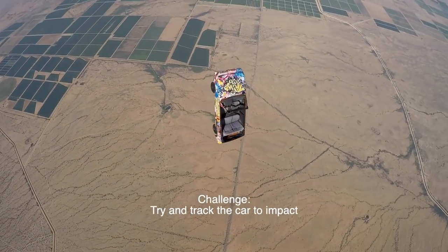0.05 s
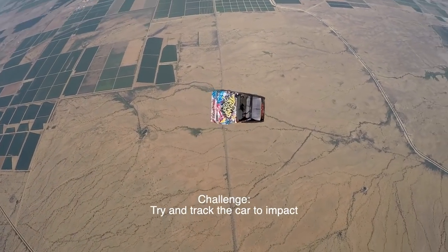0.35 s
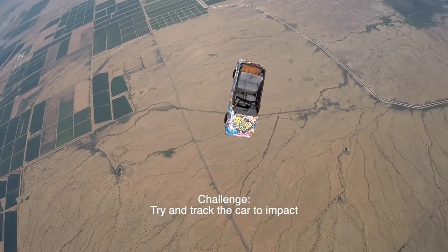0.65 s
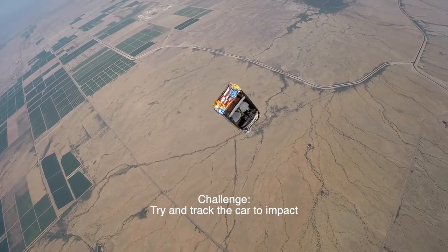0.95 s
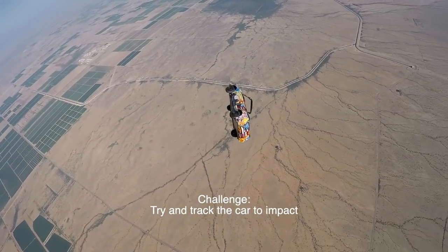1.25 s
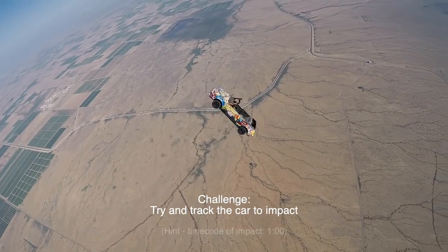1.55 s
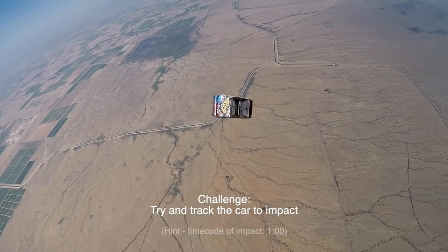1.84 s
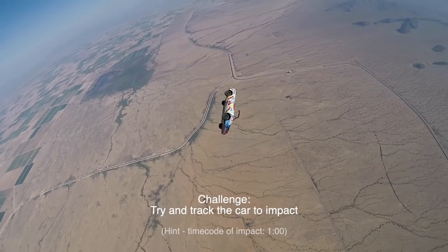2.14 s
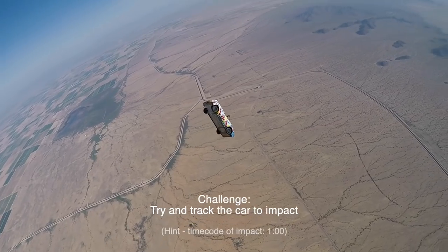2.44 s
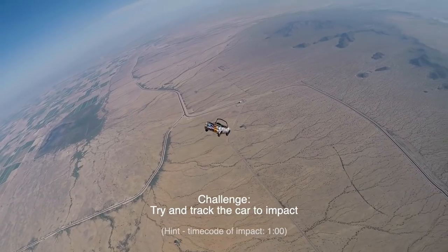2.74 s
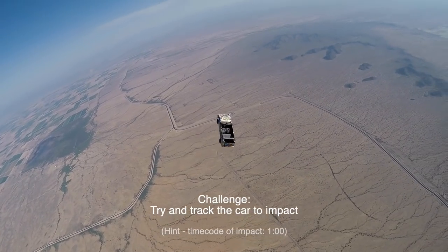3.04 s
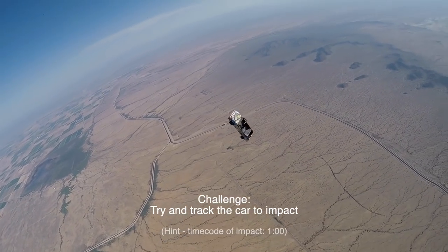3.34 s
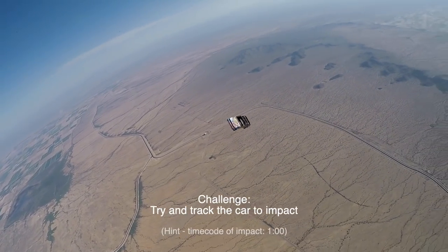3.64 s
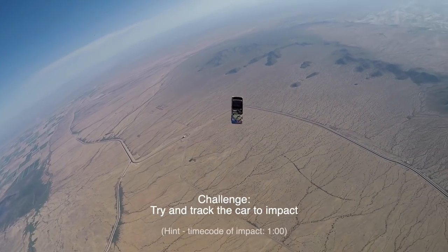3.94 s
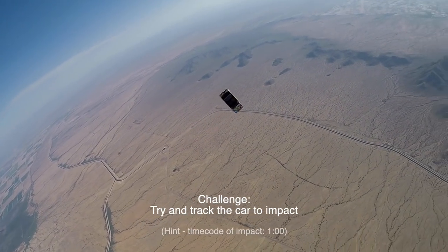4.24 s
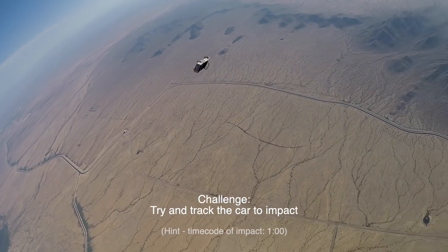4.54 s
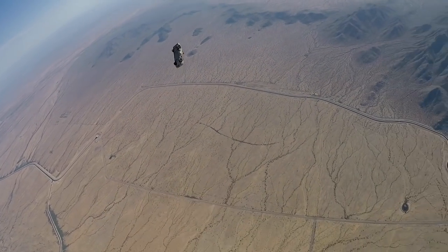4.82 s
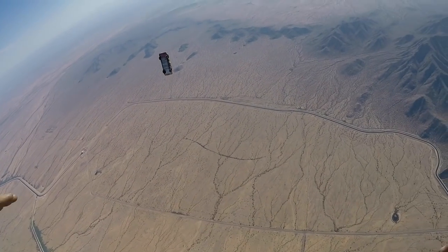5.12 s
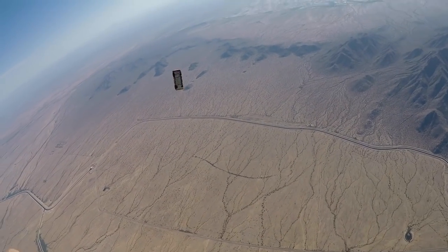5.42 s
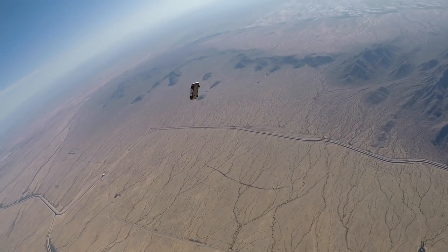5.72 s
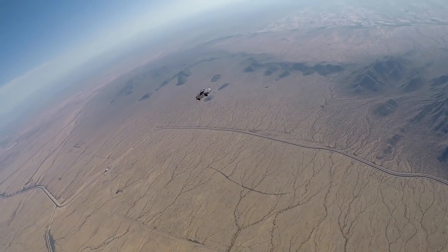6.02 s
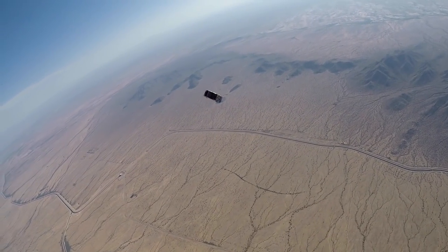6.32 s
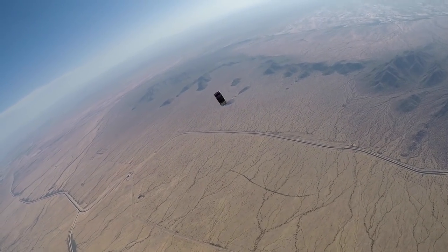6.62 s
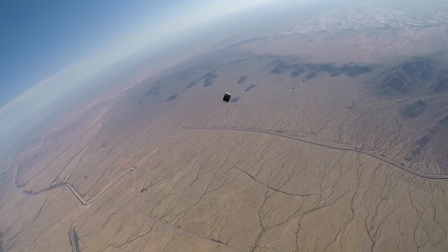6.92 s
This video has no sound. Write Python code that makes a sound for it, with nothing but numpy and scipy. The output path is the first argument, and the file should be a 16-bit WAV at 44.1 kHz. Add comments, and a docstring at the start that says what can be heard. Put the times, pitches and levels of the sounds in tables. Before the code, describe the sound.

Loud freefall wind buffets a helmet microphone, a dense rumbling roar thinning into a darker, gusty flutter.

```python
"""Freefall wind on a helmet camera

Air tears past high above open ground. Large eddies buffet the microphone, smaller ones roar and rip,
and the air hisses, whistles and spits across its port. As the head turns, the dense rush thins into
a darker, sputtering flutter, broken by gusts and slaps. A limiter holds the peaks."""
import sys
import numpy as np
from scipy import signal
from scipy.fft import rfft, irfft, next_fast_len
from scipy.io import wavfile
from scipy.ndimage import uniform_filter1d, minimum_filter1d

SR = 44100
rng = np.random.default_rng(int(sys.argv[2]) if len(sys.argv) > 2 else 0)


def materialize(psi):
    """Save the field psi as 16-bit PCM at rate SR to the path in sys.argv[1].

    A 1-D psi becomes a single channel; in a 2-D psi each row is a channel.
    """
    bounded = np.clip(np.atleast_2d(psi).T, -1, 1)
    quanta = np.round(bounded * 32767).astype(np.int16)
    wavfile.write(sys.argv[1], SR, quanta)


N = 307376
TIME = np.arange(N) / SR


def from_db(db):
    """Decibels to gain."""
    return 10 ** (np.asarray(db) / 20)


def unit_power(x):
    """Scale to an RMS of 1."""
    return x / np.sqrt(np.mean(x ** 2) + 1e-20)


def steady(x, size=SR // 10):
    """Ride the level to unit power over every short stretch; the faster flutter stays."""
    return x / np.sqrt(uniform_filter1d(uniform_filter1d(x ** 2, size), size // 2) + 1e-12)


def automation(table):
    """One curve for each column after the time, ramping from row to row."""
    times, *columns = np.transpose(table)
    return [np.interp(TIME, times, column) for column in columns]


def colour(x, spectrum):
    """EQ by a curve drawn on a log-frequency axis; white noise keeps its power."""
    size = next_fast_len(N + SR // 4)
    hz = np.maximum(np.arange(size // 2 + 1) * SR / size, 1)
    points_hz, points_db = np.transpose(spectrum)
    gain = from_db(np.interp(np.log(hz), np.log(points_hz), points_db, left=-np.inf, right=-np.inf))
    return irfft(rfft(x, size) * unit_power(gain), size)[:N]


def drift(rate_hz, step=8):
    """Smooth random modulation with a spread of about 1, rolling off above rate_hz."""
    pole = np.exp(-2 * np.pi * rate_hz * step / SR)
    noise = rng.standard_normal((N + SR) // step + 2)
    slow = signal.lfilter([1], [1, -2 * pole, pole * pole], noise)[SR // step:]
    return np.interp(np.arange(N) / step, np.arange(len(slow)), unit_power(slow))


def tails(triggers, decay_s):
    """Give every trigger an instant attack and an exponential decay."""
    return signal.lfilter([1], [1, -np.exp(-1 / (decay_s * SR))], triggers + 1e-12)


def resonance(centre_hz, width_hz):
    """Noise ringing in a narrow band whose centre may glide."""
    phase = 2 * np.pi * np.cumsum(centre_hz) / SR
    return unit_power(drift(width_hz) * np.cos(phase) + drift(width_hz) * np.sin(phase))


def turbulence(swing_db, spectrum):
    """Coloured pressure noise that comes in lumps."""
    return steady(colour(from_db(swing_db) * rng.standard_normal(N), spectrum))


def eddies(kicks_per_s=110):
    """Turbulent modulation: slow swirls, flutter, fine grain and sudden kicks, summed and soft-clipped."""
    churn = 0.23 * drift(22.2) + drift(84.0) + 1.21 * drift(247)
    arrivals = (rng.random(N) < kicks_per_s / SR) * rng.uniform(0.76, 1, N)
    kicks = tails(arrivals, decay_s=0.0084)
    cascade = unit_power(churn + 0.75 * unit_power(kicks - kicks.mean()))
    return unit_power(np.tanh(cascade / 2))


# gusts tearing through the broken flow: (start [s], length [s], rise [dB])
GUST_CUES = [(3.297, 0.09, 7.5), (3.413, .066, 4), (3.495, 0.098, 5.5), (3.63, 0.12, 4.5),
             (3.875, .11, 7.5), (4.0, 0.055, 5.5), (4.06, .034, 10), (4.165, .055, 5.5), (4.341, 0.056, 11),
             (4.444, 0.076, 6), (4.605, 0.099, 5), (4.777, 0.038, 6), (4.905, 0.051, 8.5),
             (5.025, 0.061, 7.5), (5.15, 0.04, 7.5), (5.208, .035, 8.5), (5.303, .14, 4),
             (5.628, 0.039, 12), (5.774, 0.034, 5.5), (5.885, .045, 6), (5.981, 0.066, 7.5),
             (6.121, 0.056, 4.5), (6.185, 0.045, 1.5), (6.529, 0.048, 6), (6.665, 0.072, 11.5)]
# lulls, when the stream briefly lets go of the microphone: (start [s], length [s], drop [dB])
LULL_CUES = [(1.15, 0.18, -2), (3.144, .058, -2.5), (3.456, 0.049, -6), (3.575, 0.067, -5),
             (4.11, 0.039, -2.5), (4.886, 0.033, -6), (5.07, 0.046, -4), (5.499, 0.13, -7.5),
             (5.66, 0.044, -14), (6.04, 0.038, -5.5), (6.458, 0.029, -11), (6.782, .087, -7)]


def gusts_and_lulls(attack_share=0.44):
    """Level ride in dB: each surge or lull is a rounded arch, a little quicker in than out."""
    ride_db = np.zeros(N)
    for start, length, db in GUST_CUES + LULL_CUES:
        progress = np.interp((TIME - start) / length, [0, attack_share, 1], [0, 0.5, 1])
        ride_db += db * np.sin(np.pi * progress)
    return ride_db


# low rumble EQ: (frequency [Hz], relative gain [dB])
BUFFET_EQ = [(12, -4.5), (25, -2), (45, -0.5), (100, -1.5), (165, -1.5), (240, -9), (330, -13.5),
             (480, -36.5), (800, -62)]
# eddies shed regularly by the helmet: (time [s], shedding rate [Hz], level against the rumble [dB])
SHEDDING = [(0, 63.4, -8), (.5, 61.16, -6.5), (1.05, 63.05, -4), (1.45, 57.3, -7), (1.75, 66.2, -18),
            (2.0, 70.37, -3), (2.3, 73.2, -1.5), (2.8, 68.4, -2.5), (3.15, 72.6, -4.5), (3.7, 66, -8),
            (4.25, 97.86, -4), (4.6, 67, -10.5), (5.4, 65.8, -6), (5.85, 78, -4), (6.25, 66, -7),
            (6.97, 66, -4)]


def buffet(level_db, swirl):
    """Large eddies rumble on the microphone while the helmet's shedding adds a pitched throb."""
    throb_hz, throb_db = automation(SHEDDING)
    throb = from_db(throb_db) * steady(resonance(throb_hz, width_hz=3.15))
    rumble = turbulence(2.33 * swirl, BUFFET_EQ)
    return from_db(level_db) * steady(rumble + throb)


# low-mid roar EQ: (frequency [Hz], relative gain [dB])
ROAR_EQ = [(130, -1.5), (230, 1.5), (340, 0.5), (500, -2.5), (650, -10.5), (850, -20), (1300, -34.5),
           (2500, -65.5)]


def roar(level_db, swirl):
    """Mid-sized eddies on the housing give the wind its weight."""
    return from_db(level_db) * turbulence(4.0 * swirl, ROAR_EQ)


# midrange tearing EQ and its brighter edge: (frequency [Hz], relative gain [dB])
RIP_EQ = [(350, -19), (620, 2), (950, -3.5), (1300, -7.5), (2000, -17), (2600, -24.5), (3300, -32),
          (4500, -36), (8000, -52)]
FINE_RIP_EQ = [(700, -0.5), (1400, 1.5), (2000, -5), (3000, -17), (4200, -12.5), (7000, -36)]


def rip(level_db, breakup, swirl):
    """Small eddies bunch into tearing bursts; the finest fade as the flow breaks up."""
    coarse = from_db(level_db) * turbulence(4.55 * swirl, RIP_EQ)
    fine = from_db(level_db - 5.0 - 9.7 * breakup) * turbulence(4.9 * swirl, FINE_RIP_EQ)
    return coarse + fine


# air bed EQ: (frequency [Hz], relative gain [dB])
BODY_RUSH_EQ = [(400, 1.5), (900, 0.5), (1600, -12), (2400, -18), (3400, -24.5), (4500, -25)]


def body_rush(swirl, level_db=-60):
    """Air streaming around the body lays a smooth bed between the gusts."""
    return from_db(level_db) * turbulence(1.6 * swirl, BODY_RUSH_EQ)


def port_filter(x, centre_hz, damping, block=1024):
    """The port is a resonant high-pass: it rings at its moving centre and passes what lies above."""
    out, state = np.zeros(N), np.zeros(2)
    for i in range(0, N, block):
        g = np.tan(np.pi * centre_hz[i] / SR)
        poles = [1 + damping * g + g * g, 2 * (g * g - 1), 1 - damping * g + g * g]
        out[i:i + block], state = signal.lfilter([1, -2, 1], poles, x[i:i + block], zi=state)
    return out


# hiss EQ ahead of the port's resonance: (frequency [Hz], relative gain [dB])
HISS_EQ = [(1500, -7), (3000, -10), (4400, 4), (5600, -0.5), (6800, -1), (7800, -0.5), (9300, 2.5),
           (10400, -7.5), (11400, -14), (13000, -30)]


def port_hiss(air_db, port_hz, breakup, swirl, grain):
    """Air across the port makes a resonant hiss and a breathy whistle that rings best in smooth flow."""
    rush = turbulence(2.6 * swirl + 0.6 * grain, HISS_EQ)
    hiss = from_db(air_db - 3.0) * unit_power(port_filter(rush, port_hz, damping=0.22))
    whistle = steady(resonance(port_hz, width_hz=590) * from_db(5.8 * swirl))
    return hiss + from_db(air_db - 2.5 - 12.6 * breakup) * whistle


# top-end sizzle EQ: (frequency [Hz], relative gain [dB])
SIZZLE_EQ = [(6000, -30), (8500, -14.5), (10200, -1.5), (11300, -8), (12100, 3), (12900, 2.5),
             (15100, -5.5), (16000, -18)]
# sizzle fader, before gusts and trim: (time [s], level [dB])
SIZZLE_FADER = [(0.0, -56), (0.7, -59), (1.5, -56.5), (2.2, -63), (3.35, -65.5), (4.1, -83.0),
                (4.72, -76.0), (5.15, -86.0), (6.05, -82), (6.7, -75), (6.97, -73.0)]


def port_sizzle(gust_db, swirl, grain):
    """Air at the port adds a thin, grainy sizzle at the very top."""
    fader_db, = automation(SIZZLE_FADER)
    return from_db(fader_db + 0.7 * gust_db - 1.0) * turbulence(2.0 * swirl + 7.5 * grain, SIZZLE_EQ)


# sharp spits at the port: (time [s], relative level [dB])
SPIT_CUES = [(0.964, -19), (1.091, -20), (1.4, -24.5), (1.631, -23), (1.68, -27), (1.81, -23),
             (1.904, -28.5), (2.068, -25), (2.176, -32), (2.346, -27), (2.786, -27), (6.907, -32)]
# crackle and spit EQ ahead of the port's resonance: (frequency [Hz], relative gain [dB])
SNAP_EQ = [(3500, -24), (4600, 0), (5400, 0.5), (6400, -1.5), (8000, -0.5), (9600, -1), (10500, -7.5),
           (11500, -15.5), (15000, -25)]


def port_crackle(air_db, port_hz, breakup, snaps_per_s=200):
    """Tiny vortices snap at the port in puffs of noise, harder as the flow breaks up; a few spit loudly."""
    arrivals = rng.random(N) < snaps_per_s / SR
    sizes = arrivals * from_db(-np.minimum(rng.exponential(1, N), 2))
    puffs = tails(sizes, decay_s=0.00081) * rng.standard_normal(N)
    crackle = from_db(air_db - 16.0 + 1.4 * breakup) * steady(puffs, size=SR // 12)
    times, spit_db = np.transpose(SPIT_CUES)
    triggers = np.zeros(N)
    triggers[(times * SR).astype(int)] = from_db(spit_db - 21.0)
    spits = tails(triggers, decay_s=0.0011) * rng.standard_normal(N)
    snaps = colour(crackle + spits, SNAP_EQ)
    # three passes cut steeply below the port's resonance
    for ratio, damping in [(1.14, 0.82), (0.97, 0.53), (1.0, 0.31)]:
        snaps = port_filter(snaps, port_hz * ratio, damping)
    return snaps


# hits on the housing: (time [s], relative peak [dB])
SLAP_CUES = [(1.989, -28), (2.325, -33), (2.881, -38), (3.055, -31), (3.434, -41), (3.502, -38),
             (3.556, -38), (3.906, -28), (4.012, -31), (4.187, -28), (4.499, -34), (4.662, -35),
             (5.127, -30.5), (5.219, -26), (5.318, -31), (5.642, -31), (5.899, -35.5), (6.345, -26.5)]
# dull slap EQ: (frequency [Hz], relative gain [dB])
SLAP_EQ = [(120, -12), (300, 2), (550, 3), (900, -2), (1400, -14.5), (2200, -27.5), (3300, -35),
           (6000, -31)]


def slaps(boost_db=5.0):
    """Single hard eddies slap the housing, each one pressure pulse of either polarity."""
    times, peak_db = np.transpose(SLAP_CUES)
    clicks = np.zeros(N)
    clicks[(times * SR).astype(int)] = from_db(peak_db + boost_db) * rng.choice([-1, 1], len(times))
    unit_peak = colour(signal.unit_impulse(N), SLAP_EQ)[0]
    return colour(clicks, SLAP_EQ) / unit_peak


# short fizzing bursts: (time [s], level [dB])
SPUTTER_CUES = [(3.655, -53), (3.81, -50.5), (4.28, -60), (4.57, -56), (4.63, -54), (4.675, -51),
                (5.26, -53), (5.33, -54), (5.42, -56), (5.72, -58), (5.92, -51), (6.405, -57),
                (6.45, -50.5), (6.575, -62), (6.75, -60)]
# fizz EQ, peaking just above the port's resonance: (frequency [Hz], relative gain [dB])
SPUTTER_EQ = [(5400, -20), (5800, 4), (6500, 0), (7200, -9), (8500, -11), (10000, -24)]


def port_sputters(grain, width_s=0.0063):
    """The broken flow catches the port in brief, grainy bursts."""
    bursts = sum(from_db(db) * np.exp(-0.5 * ((TIME - at) / width_s) ** 2) for at, db in SPUTTER_CUES)
    return bursts * turbulence(4.0 * grain, SPUTTER_EQ)


# the airstream before gusts, easing as the head turns: (time [s], roar level [dB], rip level [dB])
FLOW_FADERS = [(0.0, -23.0, -33.5), (0.6, -23.5, -32), (1.0, -26.0, -38.5), (1.29, -23.5, -40),
               (1.37, -27, -35), (1.55, -23.5, -36), (1.75, -23.0, -40.0), (2.3, -28.5, -43.5),
               (3.0, -28, -46), (3.6, -35.5, -51), (3.95, -34.5, -50.5), (4.22, -42.5, -55.0),
               (4.65, -31.5, -52.5), (5.0, -42, -59), (5.55, -43.5, -52.5), (6.2, -30.5, -50),
               (6.55, -37, -54.0), (6.97, -44, -58.5)]
# what the flow's angle sets: (time [s], port resonance [Hz], breakup [0 smooth, about 1 fully broken])
FLOW_ANGLE = [(0, 4370, 0.3), (.8, 4520, 0.45), (1.3, 5054, 0.37), (2.1, 5282, 0.59), (3.1, 5520, 1.03),
              (4.2, 5556, 1.33), (5.4, 5649, 1.06), (6.97, 5640, 1.06)]


def scene():
    """One turbulent stream drives every layer, from the buffet to the hiss."""
    roar_db, rip_db = automation(FLOW_FADERS)
    port_hz, breakup = automation(FLOW_ANGLE)
    swirl = breakup * eddies()
    # the layers follow the flow's swing and the gusts by different shares
    flow_db = rip_db - rip_db.mean()
    gust_db = gusts_and_lulls()
    air_db = -56 + 0.5 * flow_db + 0.69 * gust_db
    wind = (buffet(-20 + 0.084 * flow_db + 0.35 * gust_db, swirl)
            + roar(roar_db + 0.93 * gust_db, swirl)
            + rip(rip_db + gust_db, breakup, swirl)
            + slaps()
            + body_rush(swirl))
    grain = 2 * np.tanh(drift(320) / 2)  # fast flicker in the treble
    port = (port_hiss(air_db, port_hz, breakup, swirl, grain)
            + port_sizzle(gust_db, swirl, grain)
            + port_sputters(grain)
            + port_crackle(air_db, port_hz, breakup))
    return (wind + port)[None]


def limiter(x, ceiling_db, size=SR // 150):
    """The gain ducks smoothly around each peak that nears the ceiling."""
    gain = (1 + (np.abs(x) / from_db(ceiling_db)) ** 8) ** (-1 / 8)
    return x * uniform_filter1d(minimum_filter1d(gain, size), size)


def record(dry):
    """Peaks are held down, then a steep low-pass cuts the top."""
    cutoff_hz = 15500
    held = limiter(dry * from_db(-0.32), ceiling_db=-10.0)
    return signal.sosfilt(signal.ellip(10, 0.1, 80, cutoff_hz, fs=SR, output="sos"), held)


dry = scene()
out = record(dry)
materialize(out)
```